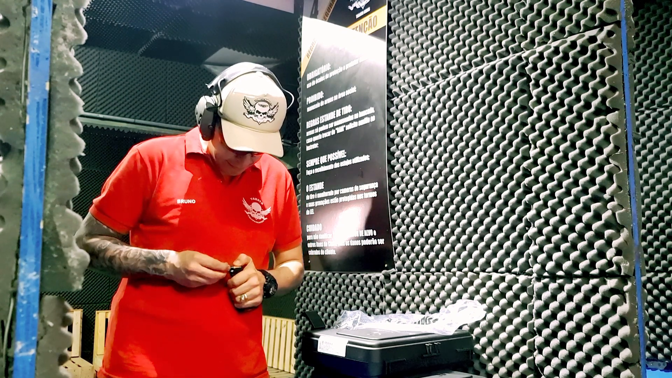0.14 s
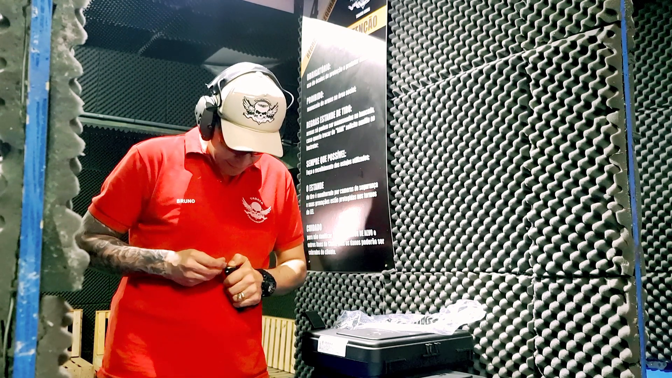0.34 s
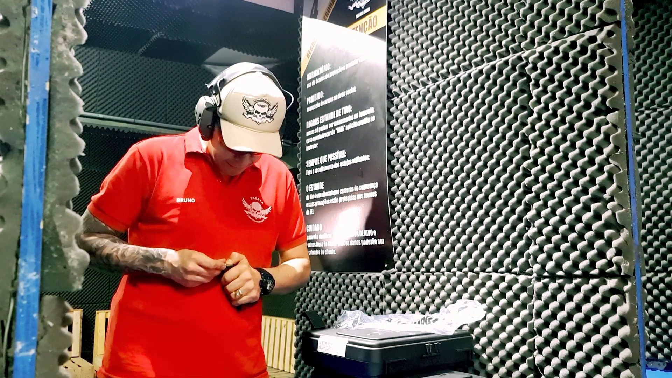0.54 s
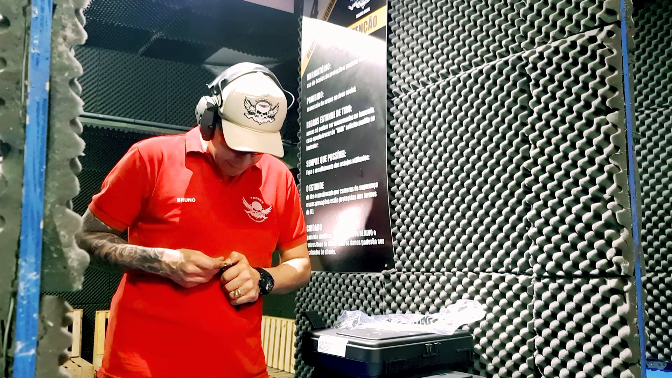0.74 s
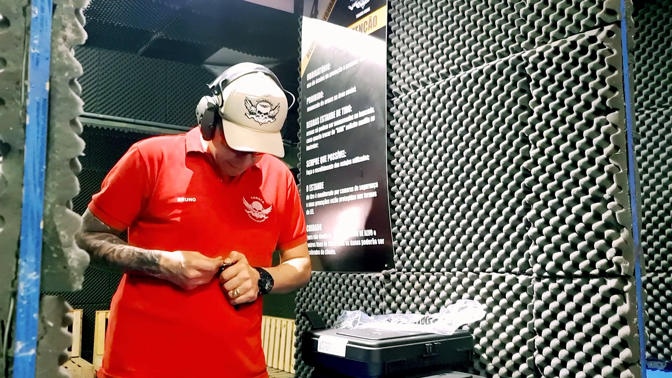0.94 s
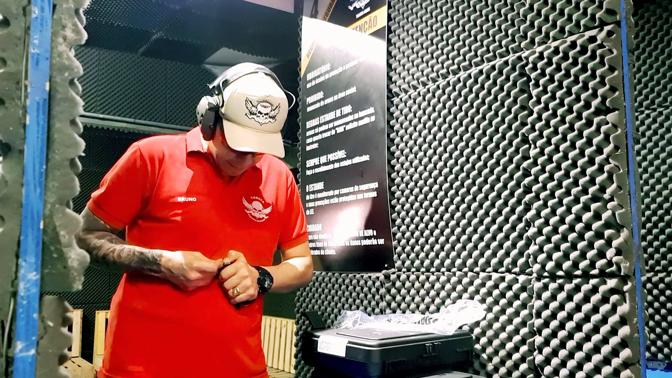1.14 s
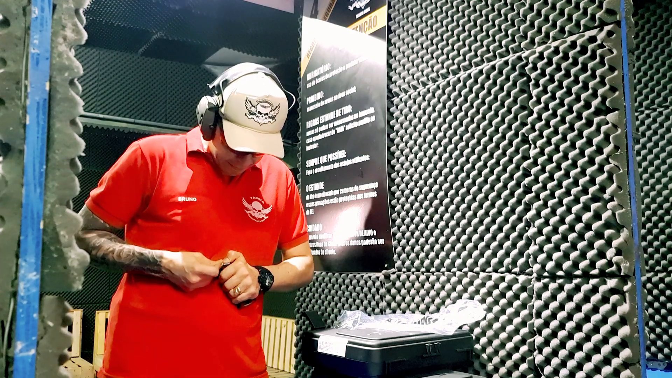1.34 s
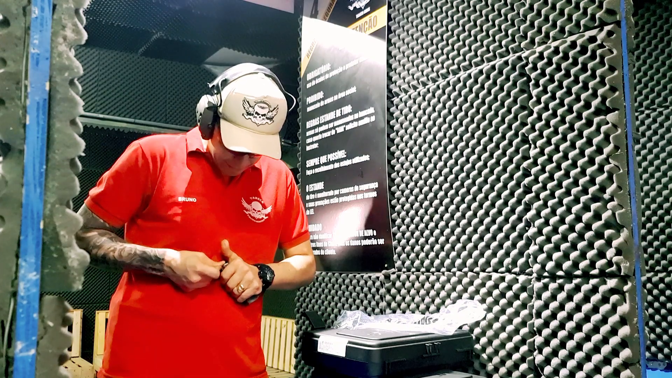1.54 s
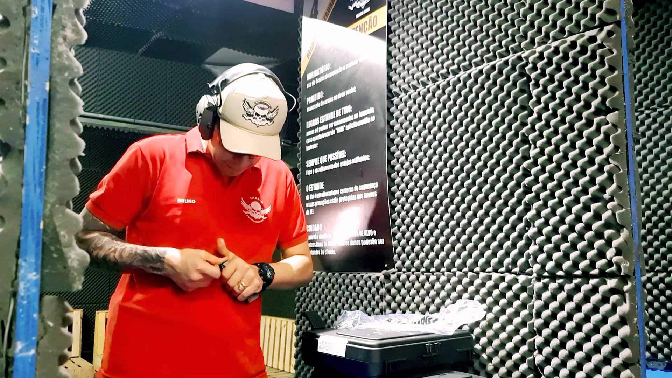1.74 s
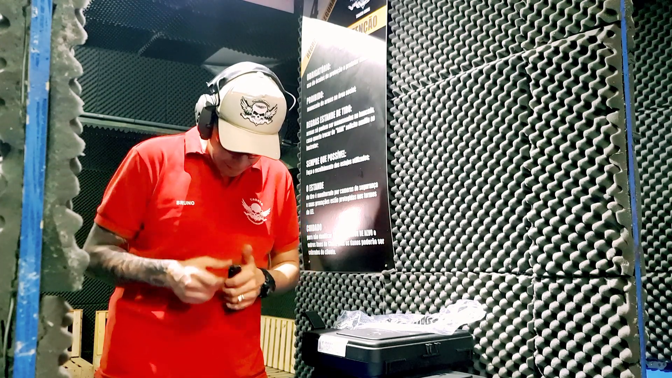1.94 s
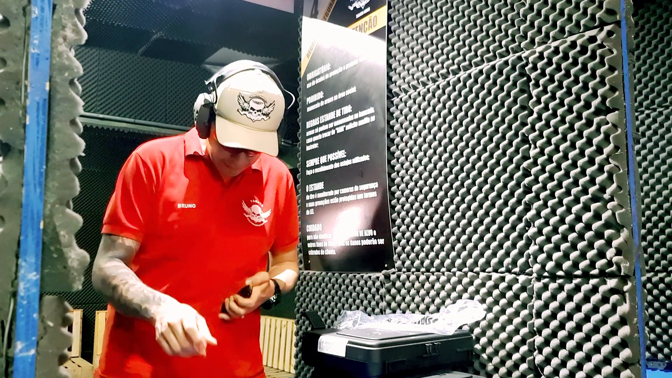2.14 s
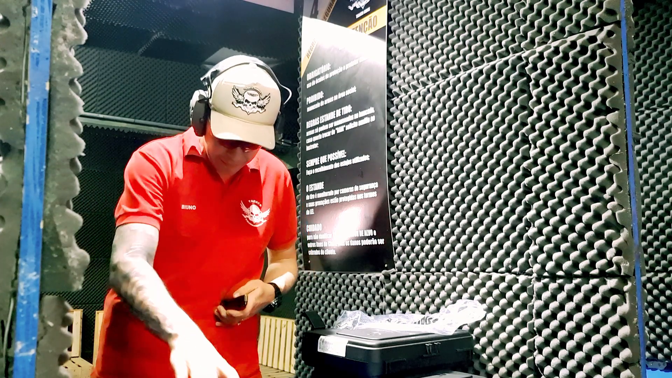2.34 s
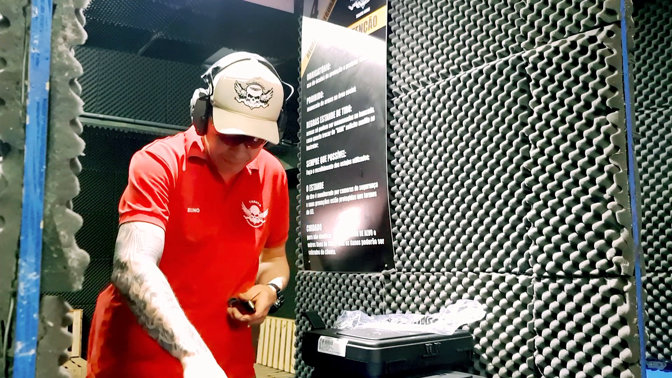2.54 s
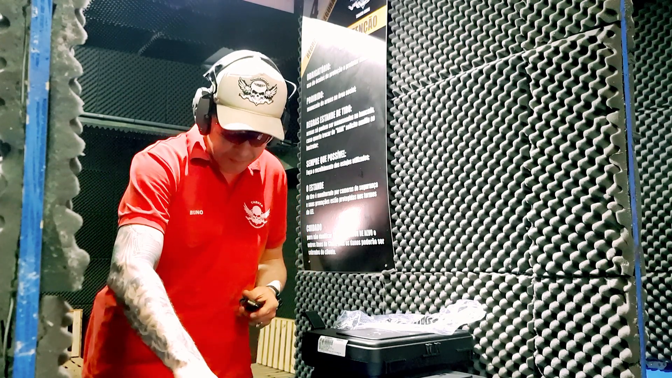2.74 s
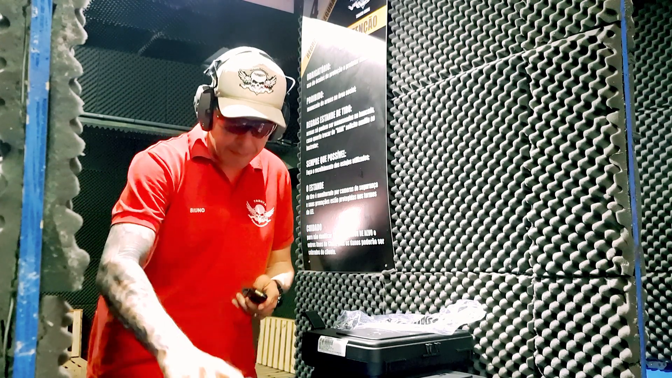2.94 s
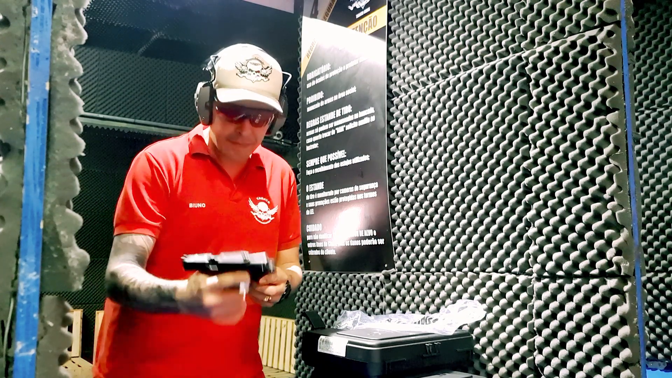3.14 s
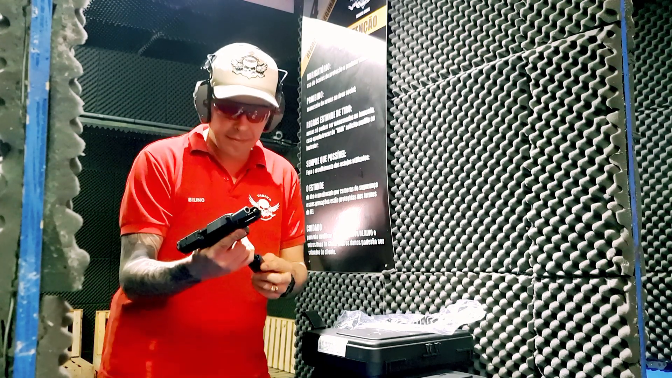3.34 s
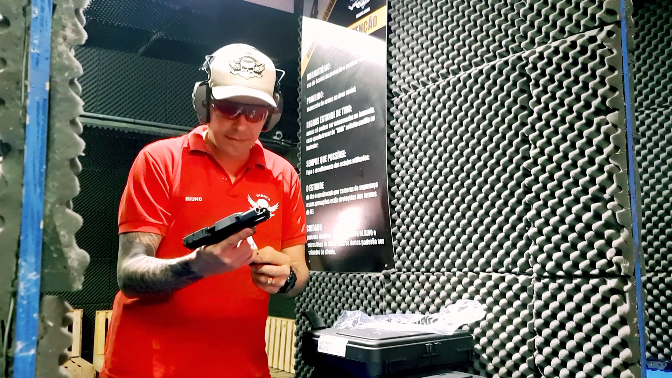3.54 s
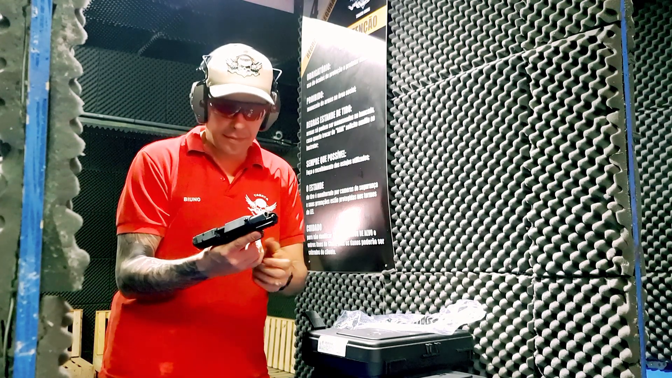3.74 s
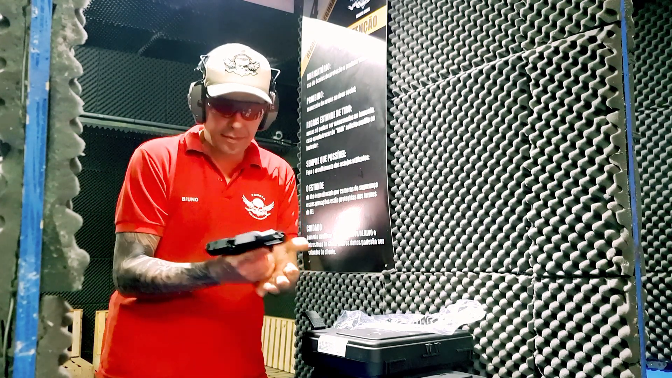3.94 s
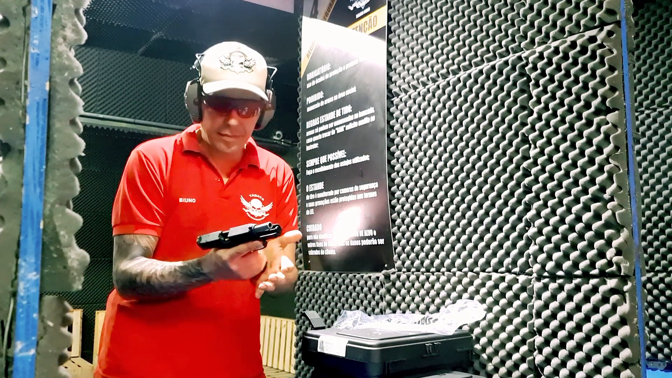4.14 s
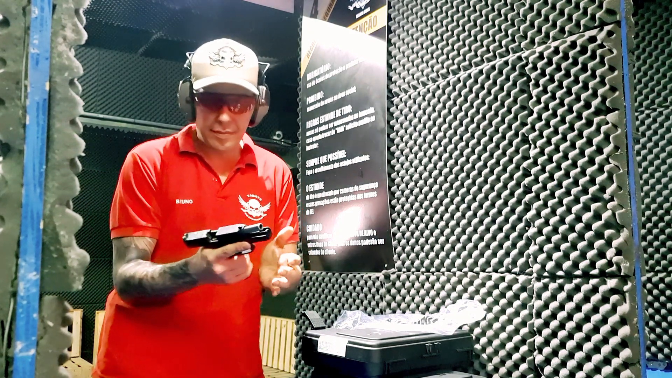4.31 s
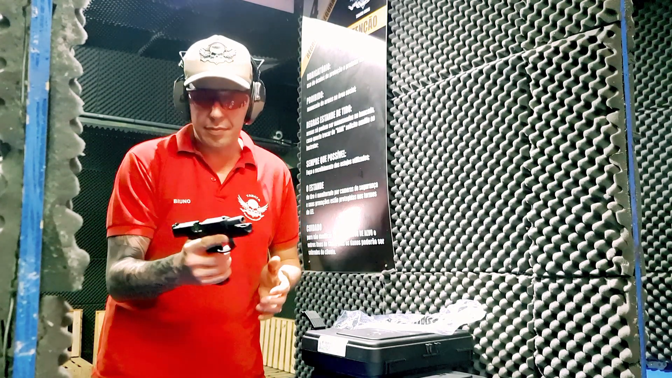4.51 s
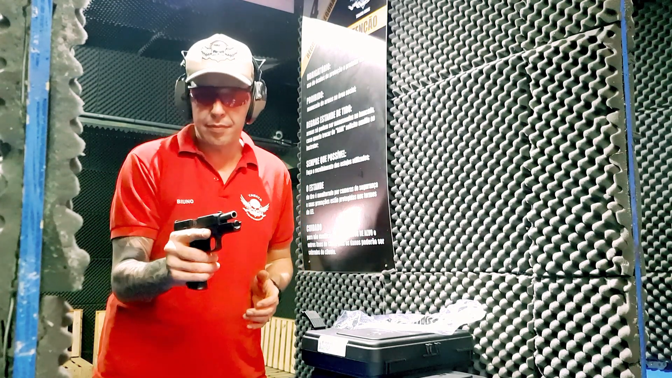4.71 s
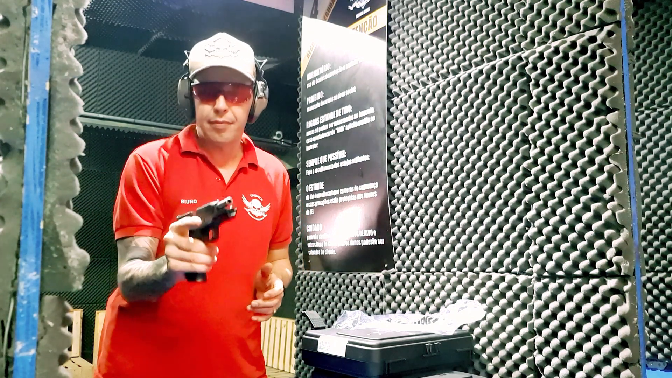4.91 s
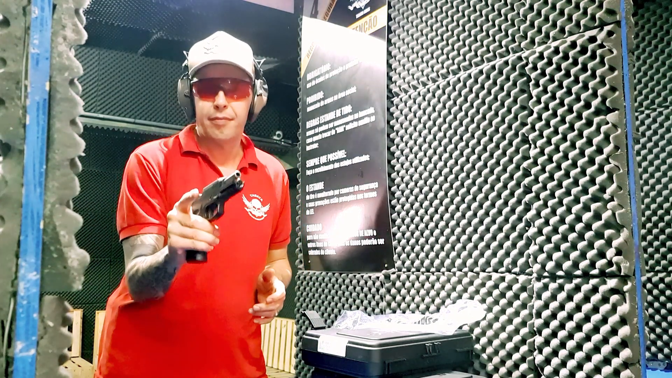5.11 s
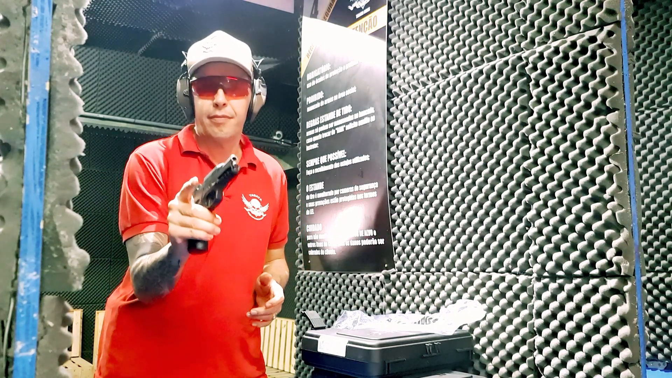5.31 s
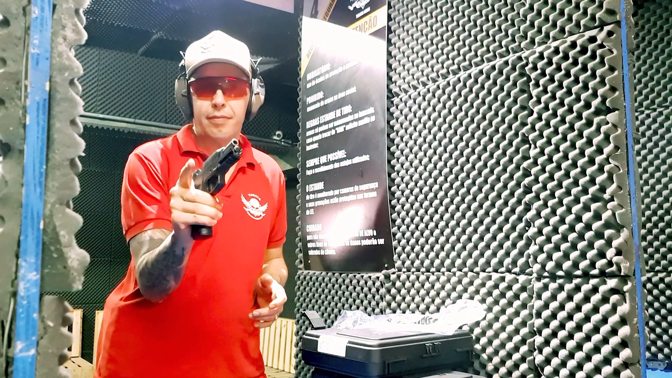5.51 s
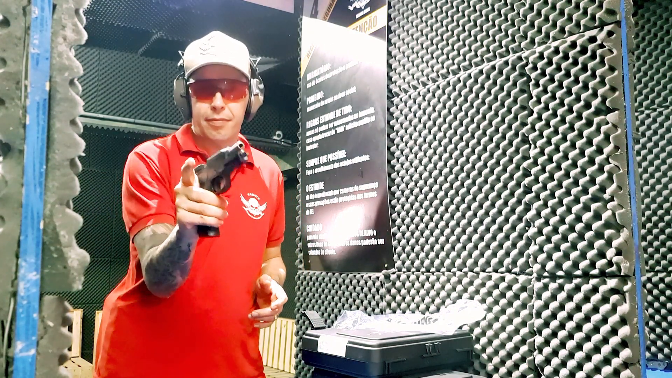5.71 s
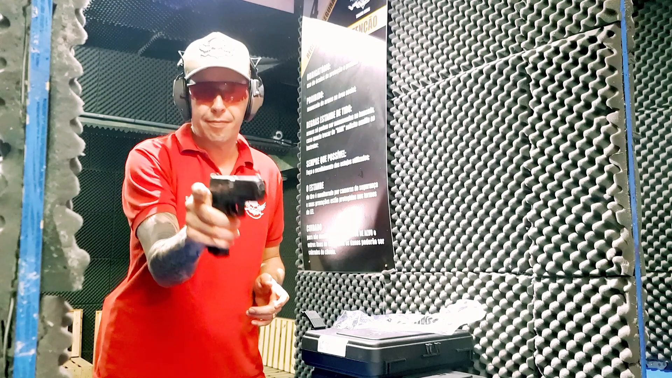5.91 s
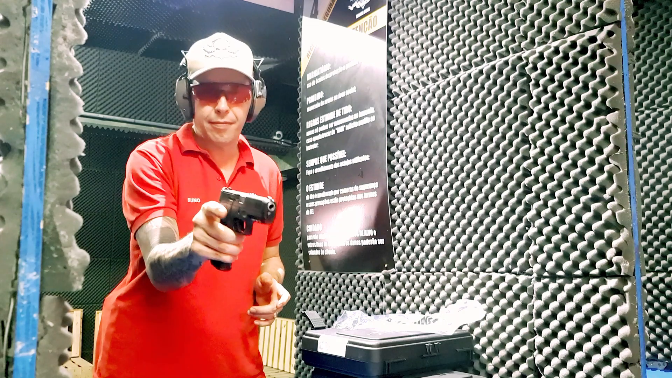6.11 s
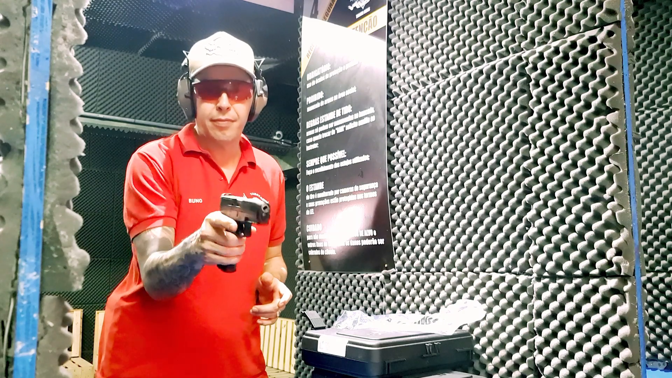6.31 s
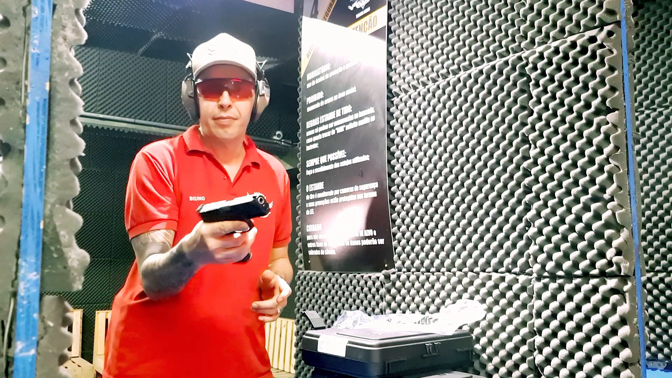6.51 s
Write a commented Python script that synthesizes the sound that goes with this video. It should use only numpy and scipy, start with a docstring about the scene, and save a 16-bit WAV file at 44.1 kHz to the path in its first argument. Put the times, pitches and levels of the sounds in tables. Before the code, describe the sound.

In an indoor range booth, heard close in stereo, low ventilation rumble and soft airy hiss run throughout; a very faint high ring dies away over the first second or so. From 0.2 s tiny brass clicks sound as a cartridge is thumbed into a magazine, with clear snaps at 1.62 and 1.76 s and weaker clicks to 1.9. Soft movement follows, then scattered pistol knocks from 2.5 s, sharper at 3.1 and 3.7, crowding together from 3.8 to 4.0 with short hoarse drags. At 4.05 s the magazine scrapes and slaps home, the loudest blow, with quick rebounds and a lane tail. Soft footfalls come near 4.5 and 5.0 s, with faint ticks. A low drone swells around 5.6. At 5.9 s the slide judders forward in a rapid metallic burst and locks, its spring ringing briefly. Reverberation fades into rumble, faint ticks and another low drone swell by 6.5 s.

```python
"""A low ventilation rumble, an airy hiss and a faint dying high ring come first, in a shooting-range booth.
Brass clicks follow as a cartridge is thumbed into a pistol magazine; the pistol knocks and ticks as it is
handled, the magazine is slapped home and the slide let fly forward. Each contact is a short noise chatter that
rings the part it hits. The booth scatters the sounds and the long lane answers the contacts.
The background is coloured noise and tones."""
import sys
import numpy as np
from scipy import signal
from scipy.fft import rfft, irfft, next_fast_len
from scipy.io import wavfile
from scipy.ndimage import uniform_filter1d

SR = 44100
rng = np.random.default_rng(int(sys.argv[2]) if len(sys.argv) > 2 else 0)


def store_pcm(level_fs):
    """Save levels as 16-bit WAV."""
    pcm = np.round(np.clip(level_fs, -1, 1) * 32767).astype(np.int16)
    wavfile.write(sys.argv[1], SR, np.atleast_2d(pcm).T)


N = 289290

# A contact's three registers, thud, body and edge: [low f/Hz, high f/Hz]
# In the contact tables below, each level sets one register's strength as an rms over 20 ms.
REGISTERS = [(250, 1200), (1200, 5000), (5000, 15000)]
# Brass clicks on the magazine lips: [t/s, body level/dB, edge level/dB, ring f/Hz, chatter decay/ms]
CARTRIDGE_CLICKS = [(0.23, -65, -75, 4230, 2.2), (0.526, -55.5, -58.5, 4750, 2.4),
                    (0.634, -50.5, -54, 4000, 0.8), (1.2635, -53.5, -54.5, 3380, 2.5),
                    (1.415, -60.5, -76, 2150, 2), (1.529, -68, -62, 6500, 2.3),
                    (1.5745, -73, -67, 7000, 1.3), (1.591, -63, -66, 2950, 1.5),
                    (1.6233, -35.3, -40.3, 2480, 1.5), (1.7615, -40, -49.5, 2960, 2.3),
                    (1.8768, -54.5, -66, 3020, 2.8), (1.892, -53, -58, 4170, 5.2)]
CARTRIDGE_THUD_DB = -5.5   # relative to the edge
# Knocks and faint ticks of the handled pistol, before and after the magazine goes home:
# [t/s, body level/dB, hardness/dB, ring f/Hz, chatter decay/ms]
HANDLING_KNOCKS = [(2.4645, -65, -9, 1360, 4.6), (2.7502, -45, 8, 1900, 4.2), (2.7937, -57, -11, 1000, 6),
                   (2.8948, -44.5, 3, 2400, 4.5), (3.135, -38.5, 15.5, 2680, 2.6),
                   (3.284, -50, 9, 3040, 1.7), (3.352, -78, -24, 481, 8.6), (3.492, -51, -7, 1970, 8),
                   (3.6985, -37.5, 8, 1250, 7.7), (3.799, -55, -3, 1400, 2.6), (3.809, -50, -2, 2900, 6.9),
                   (3.8175, -54.5, -12, 1288, 4), (3.8532, -48.5, -6, 1700, 7.3),
                   (3.879, -60, -12, 1200, 14), (3.905, -49.5, 1, 1400, 12), (3.96, -48.5, -1, 1900, 14),
                   (4.005, -57, -6, 1505, 7.6), (4.0225, -45, 0, 1900, 9), (4.448, -69.5, -9, 2000, 8),
                   (4.795, -70, 0, 1900, 3), (5.0435, -67.5, 3, 3200, 3.2), (5.2122, -67.5, 2, 3050, 4),
                   (5.69, -59, 9, 3000, 3), (5.8178, -52.5, 12, 3100, 6), (6.401, -69, -5, 1203, 5.3),
                   (6.4468, -67.5, 0, 3120, 3), (6.5112, -70, 16, 4020, 1.5)]
SOFT_EDGE_DB, EDGE_PER_HARDNESS = -16.5, .6   # edge over body at hardness 0; dB gained per dB of hardness
# The magazine shoves the catch aside and scrapes past it:
# [t/s, thud level/dB, body level/dB, edge level/dB, ring f/Hz, chatter decay/ms]
CATCH_SCRAPES = [(4.0464, -38.5, -21, -18, 1740, 1.7), (4.058, -46, -32.5, -34, 6700, 1.0),
                 (4.064, -41.5, -28.5, -36, 2100, 8)]
# The magazine hits home, first blow: [columns as for the catch]
SEAT_BLOW = (4.0762, -26.5, -18.5, -21, 2200, 2.5)
SEAT_GAP_S, SEAT_LOSS_DB = .0045, 4.8   # typical gap and loss per rebound
# The slide judders forward and strips a round, first blow: [columns as for the catch]
SLIDE_BLOW = (5.902, -38.3, -22.3, -24.3, 2400, 3.5)
SLIDE_GAP_S, SLIDE_LOSS_DB = .0048, .2   # typical gap and loss per judder
# The slide locks: [columns as for the catch]
LOCK_BLOW = (5.933, -35.5, -28, -23.5, 4675, 8.5)
# Resonances of each part: [f/Hz, width/Hz, level above the broad spectrum/dB]
MAGAZINE_MODES = [(1260, 71, 2), (1840, 52, 1), (2510, 110, 10), (2970, 70, -6), (4110, 160, -1.5),
                  (5930, 76, 7), (6700, 50, 6.5), (8600, 90, 3)]
FRAME_MODES = [(760, 98, 8.7), (1280, 90, 4), (1530, 130, 2), (2103, 150, 3), (2400, 77, 2),
               (2810, 34, 3.1), (3028, 90, 4), (4170, 300, 5), (5150, 240, 3.2)]
CATCH_MODES = [(1730, 60, 5), (3320, 75, 4), (3620, 40, 5), (3980, 26, 7), (5400, 40, 5), (6315, 16, 3.1),
               (6710, 90, 11), (9160, 30, 6)]
SEAT_MODES = [(650, 70, 5), (2110, 36, 6), (2226, 30, 4), (2450, 50, 2), (2663, 29, 4.6), (2820, 40, 4),
              (3004, 40, 4.5), (3860, 22, 6), (4660, 40, 3), (5370, 35, 4), (6200, 33, 4), (6620, 44, 5),
              (7100, 48, 4), (9530, 60, 5)]
SLIDE_MODES = [(600, 150, 6), (1940, 80, 4), (2120, 34, 3.4), (2420, 23, 3.4), (2850, 35, 4),
               (3050, 35, 4.5), (3283, 25, 4.6), (4230, 30, 5), (4460, 26, 4.5), (4550, 45, 3),
               (6500, 73, 3.4), (7850, 150, 3), (11600, 80, 4)]
# Broad colour of each contact, before its registers are set: [f/Hz, relative level/dB]
MAGAZINE_TONE = [(150, -28), (250, -13), (823, -5.5), (2060, -8), (2240, -8), (2530, -18), (2760, -7),
                 (8620, -5.5), (9390, -14), (13700, -14.5), (15500, -55)]
FRAME_TONE = [(150, -39.5), (250, 3), (961, -9.5), (1220, -2), (2800, -4.5), (4030, -9.5), (4870, -11),
              (5690, -12.5), (9560, -28), (11600, -27.5), (15500, -38)]
CATCH_TONE = [(150, -46.5), (250, -20.5), (525, -21.5), (1380, -6), (1730, -3.5), (2090, -5.5),
              (2900, -9.5), (4100, -4.5), (4870, -14), (6540, -5), (7900, -15), (9390, -18), (10600, -30),
              (12200, -17), (15500, -28)]
SEAT_TONE = [(150, -18), (350, -13), (490, -14), (600, -5), (700, -4), (820, -10), (1050, -9), (1800, -10),
             (2200, -5), (3900, -5), (7000, -12), (9000, -20), (11800, -20), (15500, -29)]
SLIDE_TONE = [(150, -31), (350, -13), (480, -15.5), (650, -11), (1100, -13), (1600, -1.5), (2300, -2.5),
              (3100, -1), (4300, -2), (5900, -8), (7900, -7), (10000, -14.5), (12000, -11), (15500, -23)]
# The recoil spring sings on: [t/s, f/Hz, peak level of the main tone/dB, t60/s]
SPRING = (5.91, 1942, -37, 0.3)
# The grip drags over a surface: [t/s, level before its envelope/dB, start f/Hz, end f/Hz, pitch fall/s]
DRAGS = [(2.794, -42, 1699, 245, .008), (3.817, -44, 750, 400, .005)]
# The lane's tail: [f/Hz, t60/s, relative level/dB]
LANE = [(200, .5, -1), (590, .48, 0.5), (1190, 0.47, -3.5), (2500, 0.42, -2.5), (5000, .36, -2.5),
        (9000, 0.28, -3), (14000, .21, -1.5)]
FAR_WALL_S, MIC_LAG_S = .17, .00006   # start of the far echo; delay of the right channel
# Likeness of left and right, in diffuse and in direct sound: [f/Hz, likeness from 0 to 1]
DIFFUSE_LIKENESS = [(60, .92), (130, 1), (250, 0.2), (500, 0.1), (1000, 0), (4000, 0.1), (12000, .05)]
DIRECT_LIKENESS = [(300, 1), (1000, 0.78), (3000, 0.71), (8000, 0.31), (15000, .4)]
# Soft, dull footfalls as the shooter shifts weight: [t/s, length/s, level/dB]
STEPS = [(4.47, .2, -46), (5.04, .2, -51)]
STEP_ATTACK_S, STEP_RELEASE_S = .05, .1
# Soft low noise: body and sleeves shifting, and the dull thump under the magazine and slide blows:
# [t/s, length/s, level/dB]
SOFT_LOW_SWELLS = [(2.28, .45, -58), (2.8, .07, -50.5), (3.33, .05, -49), (3.48, .12, -55),
                   (3.86, .11, -45.5), (4.05, .07, -46), (4.2, 2.35, -59), (5.9, .1, -48), (6.4, .12, -56)]
SOFT_LOW_REST_DB, SOFT_LOW_ATTACK_S, SOFT_LOW_RELEASE_S = -65.5, .03, .045
# Ventilation rumble, before a small left-right tilt: [t/s, level/dB]
RUMBLE_LEVEL = [(0, -52.5), (2.5, -51), (3.0, -48), (4.6, -45.5), (5.5, -48), (6.56, -47)]
# Airy hiss of the ventilation: [t/s, level/dB]
AIR_LEVEL = [(0, -57), (2.2, -57), (3.2, -54.5), (4.4, -60), (5.5, -58.5), (6.56, -62)]
# Colours of the background noises: [f/Hz, relative level/dB]
STEP_TONE = [(60, -25.5), (105, -1.5), (150, 0), (210, -2.5), (270, -7.5), (330, -20), (400, -13.5),
             (480, -25.5), (1500, -54.5)]
SOFT_LOW_TONE = [(60, -26.5), (110, -2.5), (200, 0.5), (300, -7), (450, -11.5), (900, -23.5), (2000, -33.5),
                 (6000, -55.5)]
RUMBLE_TONE = [(15, -25.5), (25, -15.5), (42, -8), (55, -4), (66, 2), (85, -4), (105, -11), (150, -29),
               (300, -63.5)]
AIR_TONE = [(60, -8), (110, -2.5), (160, -9), (245, -6.5), (310, -12), (385, -5), (470, -15.5),
            (680, -15.5), (1000, -22.5), (1800, -22.5), (3200, -27), (5500, -34.5), (9000, -44),
            (12000, -38), (15500, -39.5)]
# A drone swells in the building: [t/s, length/s, level before swell and tilt/dB, start f/Hz]
DRONE_SWELLS = [(5.53, .36, -42.5, 78.5), (6.42, .17, -33.5, 93)]
DRONE_ATTACK_S, DRONE_RELEASE_S, DRONE_RISE_HZ_PER_S = .2, .12, 7
# A faint high ring dies away from the start: [f/Hz, starting peak level/dB]
WHINE = [(2159, -75), (2283, -79), (2534, -70), (2558, -72)]
WHINE_T60_S = 1.6
CUTOFF_HZ = 15600


def contacts(table, tone, modes, ring_db, ring_width, rise_ms, grit_db, size=8192):
    """Each contact is a dying chatter of tiny impacts that rings the part; where it lands favours one pitch."""
    out = np.zeros((2, N + size))
    hz = np.fft.rfftfreq(size, 1 / SR)
    ms = np.arange(size) / SR * 1000
    part = from_db(at_hz(tone, hz)) * np.sqrt(np.abs(1 + sum(peak(hz, *mode) for mode in modes)))
    filters = [signal.butter(3, band, "band", fs=SR, output="sos") for band in REGISTERS]
    registers = [signal.sosfreqz(sos, hz, fs=SR)[1] for sos in filters]
    weights = np.abs(registers) ** 2 + 1e-12
    low_cut = hz ** 2 / (hz ** 2 + 180 ** 2)
    right_later = np.exp(-2j * np.pi * hz * MIC_LAG_S * np.array([[0], [1]]))
    fade_out = np.minimum(np.linspace(2, 0, size), 1)   # fade the end smoothly to silence
    for s, *levels, ring_hz, chatter_ms in table:
        envelope = (1 - np.exp(-(ms / rise_ms) ** 2)) * np.exp(-ms / max(chatter_ms, .1))
        grit = from_db(grit_db * np.repeat(rng.standard_normal(size // 16), 16))   # uneven strength
        chatter = rng.standard_normal((2, size)) * envelope * grit
        blow = two_ports(rfft(chatter), DIRECT_LIKENESS, hz)
        # flatten the broad spectrum so that every pitch gets its share
        smooth_power = uniform_filter1d(np.abs(blow) ** 2, size=160, axis=1)
        blow /= causal(np.sqrt(smooth_power + 1e-12))
        colour = part * np.sqrt(np.abs(0.5 + peak(hz, ring_hz, ring_width * ring_hz, ring_db)))
        # the hardness of the contact sets how much goes into each register
        energy = [np.mean(np.sum(irfft(blow * colour * band) ** 2, axis=1)) for band in registers]
        gains = from_db(levels) * np.sqrt(.02 * SR / np.array(energy))
        hardness = np.exp(np.log(gains) @ weights / weights.sum(0)) * low_cut
        at = int(s * SR)
        out[:, at:at + size] += irfft(blow * causal(colour * hardness) * right_later) * fade_out
    return out[:, :N]


def rebounds(blow, gap_s, loss_db, count):
    """A blow repeats at uneven gaps, weaker each time and landing a little differently."""
    s, thud, body, edge, ring_hz, chatter_ms = blow
    rows = []
    for k, (late, place) in enumerate(rng.uniform(-1, 1, (count, 2))):
        when = s + gap_s * (k + .25 * late * (k > 0))
        loss = k * loss_db
        rows.append((when, thud - loss, body - loss, edge - loss, ring_hz * 2 ** (.4 * place), chatter_ms))
    return rows


def magazine_home():
    """The magazine scrapes past the catch, hits home and rebounds."""
    seating = rebounds(SEAT_BLOW, SEAT_GAP_S, SEAT_LOSS_DB, count=3)
    catch = contacts(CATCH_SCRAPES, CATCH_TONE, CATCH_MODES,
                     ring_db=2.5, ring_width=.12, rise_ms=1.3, grit_db=2)
    seat = contacts(seating, SEAT_TONE, SEAT_MODES, ring_db=2, ring_width=.3, rise_ms=1.2, grit_db=2.5)
    return (catch + seat) * from_db([[-.7], [.7]])   # a little to the right


def slide():
    """The slide judders forward in a string of blows, then locks."""
    closing = rebounds(SLIDE_BLOW, SLIDE_GAP_S, SLIDE_LOSS_DB, count=6) + [LOCK_BLOW]
    return contacts(closing, SLIDE_TONE, SLIDE_MODES, ring_db=1.5, ring_width=0.3, rise_ms=1.6, grit_db=2.5)


def cartridge():
    """The sharper the brass snaps, the harder it also thuds against the follower."""
    rows = [(s, edge + CARTRIDGE_THUD_DB, body, edge, hz, ms) for s, body, edge, hz, ms in CARTRIDGE_CLICKS]
    return contacts(rows, MAGAZINE_TONE, MAGAZINE_MODES,
                    ring_db=6, ring_width=0.12, rise_ms=0.73, grit_db=-3.5)


def handling():
    """A hard contact trades thud for edge; a soft one, through the hand, does the opposite."""
    rows = []
    for s, body, hard, hz, ms in HANDLING_KNOCKS:
        edge = body + SOFT_EDGE_DB + EDGE_PER_HARDNESS * hard
        rows.append((s, body - hard, body, edge, hz, ms))
    return contacts(rows, FRAME_TONE, FRAME_MODES, ring_db=5, ring_width=0.2, rise_ms=1.1, grit_db=3)


def spring():
    """The shaken coil sings two close tones that beat against each other as they die away."""
    s, hz, db, t60 = SPRING
    t = np.maximum(np.arange(N) / SR - s, 0)
    pair = np.sin(2 * np.pi * hz * t) + .4 * np.sin(2 * np.pi * (hz - 48) * t)
    return from_db(db - 60 * t / t60) * pair


def drags(rough, fade_s):
    """Stick and slip slow down as the drag comes to rest; the uneven slipping makes the tone hoarse."""
    out = np.zeros(N)
    t = np.arange(int(.15 * SR)) / SR
    envelope = (1 - np.exp(-t / 0.0017)) * np.exp(-t / fade_s)
    for s, db, start_hz, end_hz, fall_s in DRAGS:
        waver = rms_one(uniform_filter1d(rng.standard_normal(len(t)), size=40))
        hz = (end_hz + (start_hz - end_hz) * np.exp(-t / fall_s)) * (1 + rough * waver)
        tone = np.sqrt(2) * np.sin(2 * np.pi * np.cumsum(hz) / SR)
        at = int(s * SR)
        out[at:at + len(t)] += from_db(db) * envelope * tone
    return out


def booth(x, wet_db, first_s, fade_s):
    """Bench, ceiling and partitions scatter the near sounds into a short, dying noise tail."""
    t = np.arange(int(.08 * SR)) / SR
    response = rng.standard_normal((2, len(t))) * (t > first_s) * np.exp(-t / fade_s)
    response /= np.sqrt(np.sum(response ** 2, axis=1, keepdims=True))
    return x + from_db(wet_db) * signal.fftconvolve(x, response, axes=1)[:, :N]


def lane(x, far_db, far_spread_s, far_cut_hz, build_s):
    """The long lane: a tail that dies fastest in the treble, and a dull, smeared echo off the far end."""
    t = np.arange(int(.7 * SR)) / SR
    hz = np.fft.rfftfreq(len(t), 1 / SR)
    white = two_ports(rfft(rng.standard_normal((2, len(t)))), DIFFUSE_LIKENESS, hz)
    late = np.maximum(t - FAR_WALL_S, 0) / far_spread_s
    response = 0
    edges = np.geomspace(100, 16000, 12)   # eleven bands, each with its own decay
    for low, high in zip(edges, edges[1:]):
        centre = np.sqrt(low * high)
        tail = from_db(-60 * t / at_hz(LANE, centre)) * (1 - np.exp(-t / build_s))
        echo = from_db(far_db) * late * np.exp(1 - late) / (1 + (centre / far_cut_hz) ** 2)
        band = irfft(white * ((hz >= low) & (hz < high)), len(t))
        response = response + band * np.hypot(tail, echo) * from_db(at_hz(LANE, centre, axis=2))
    response = response / np.sqrt(np.sum(response ** 2) / 2)
    return signal.fftconvolve(x, response, axes=1)[:, :N]


def footfalls():
    """Soft footfalls are dull noise that swells and dies away."""
    return swells(STEPS, STEP_ATTACK_S, STEP_RELEASE_S) * noise(STEP_TONE)


def soft_low_noise():
    """Shifting body and sleeves, and the dull thump under the blows, swell out of a faint steady noise."""
    gain = swells(SOFT_LOW_SWELLS, SOFT_LOW_ATTACK_S, SOFT_LOW_RELEASE_S)
    return np.hypot(from_db(SOFT_LOW_REST_DB), gain) * noise(SOFT_LOW_TONE)


def drone(octave_db):
    """Each swell is a low tone with a weak octave, creeping upwards."""
    out = 0
    for s, length_s, db, start_hz in DRONE_SWELLS:
        hz = start_hz + DRONE_RISE_HZ_PER_S * (np.arange(N) / SR - s)
        phase = 2 * np.pi * np.cumsum(hz) / SR
        tone = np.sqrt(2) * (np.sin(phase) + from_db(octave_db) * np.sin(2 * phase))
        out = out + from_db(db) * swell(s, length_s, DRONE_ATTACK_S, DRONE_RELEASE_S) * tone
    return out


def whine():
    """A few high, steady tones fade together."""
    t = np.arange(N) / SR
    tones = sum(from_db(db) * np.sin(2 * np.pi * hz * t) for hz, db in WHINE)
    return tones * np.exp(-np.log(1000) * t / WHINE_T60_S)


def ventilation_rumble():
    """Moving air rumbles as very low noise whose level drifts."""
    return from_db(level_in_time(RUMBLE_LEVEL)) * noise(RUMBLE_TONE)


def ventilation_hiss():
    """The airy part of the ventilation is broad noise whose level drifts."""
    return from_db(level_in_time(AIR_LEVEL)) * noise(AIR_TONE)


def background():
    """The soft low noise, footfalls, fading ring, drone and ventilation add up."""
    low = (ventilation_rumble() + drone(octave_db=-15)) * from_db([[.7], [-.7]])   # a little to the left
    return low + ventilation_hiss() + soft_low_noise() + footfalls() + whine()


def swell(s, length_s, attack_s, release_s):
    """A gain that rises to a ceiling and starts to die away once its length is over."""
    t = np.arange(N) / SR - s
    return np.clip(t / attack_s, 0, 1) * np.exp(-np.maximum(t - length_s, 0) / release_s)


def swells(rows, attack_s, release_s):
    """The joint gain of several swells, whose powers add."""
    power = sum((from_db(db) * swell(s, length_s, attack_s, release_s)) ** 2 for s, length_s, db in rows)
    return np.sqrt(power)


def noise(tone):
    """Steady diffuse stereo noise of a given colour; rms 1."""
    size = next_fast_len(N, real=True)
    hz = np.fft.rfftfreq(size, 1 / SR)
    white = two_ports(rfft(rng.standard_normal((2, size))), DIFFUSE_LIKENESS, hz)
    return rms_one(irfft(white * from_db(at_hz(tone, hz)), size)[:, :N])


def two_ports(pair, likeness, hz):
    """Two unrelated spectra become a left and a right one of the given likeness."""
    alike = np.clip(at_hz(likeness, hz), 0, 1)
    shared = np.sqrt(1 + alike) * pair[0]
    opposed = np.sqrt(1 - alike) * pair[1] * np.array([[1], [-1]])
    return shared + opposed


def peak(hz, centre, width, db):
    """The power one resonance adds to a flat spectrum of 1."""
    return (from_db(2 * db) - 1) / (1 + (2 * (hz - centre) / width) ** 2)


def causal(gain):
    """The minimum-phase response with this gain: resonances ring after the blow."""
    cepstrum = irfft(np.log(gain + 1e-9))
    half = cepstrum.shape[-1] // 2
    cepstrum[..., 1:half] *= 2
    cepstrum[..., half + 1:] = 0
    return np.exp(rfft(cepstrum))


def at_hz(points, hz, axis=1):
    """Read a column of a table along a log-frequency axis."""
    points = np.array(points)
    return np.interp(np.log(hz + 1e-9), np.log(points[:, 0]), points[:, axis])


def level_in_time(rows):
    """Read a level curve sample by sample."""
    s, db = np.transpose(rows)
    return np.interp(np.arange(N) / SR, s, db)


def from_db(db):
    """Turn decibels into a gain."""
    return 10 ** (np.asarray(db) / 20)


def rms_one(x):
    """Scale a signal to an rms of 1."""
    return x / np.sqrt(np.mean(x ** 2) + 1e-20)


def scene():
    """Near sounds pass through the booth; the slide and magazine blows are sent to the lane most strongly."""
    home, closing, clicks, knocks = magazine_home(), slide(), cartridge(), handling()
    by_hand = clicks + knocks + home + closing + spring() + drags(rough=.25, fade_s=.042)
    near = booth(by_hand, wet_db=-5, first_s=0.0028, fade_s=.013)
    sent = from_db(-13.5) * home + from_db(-11) * closing + from_db(-15.5) * clicks + from_db(-14.5) * knocks
    far = lane(sent, far_db=-25.5, far_spread_s=0.018, far_cut_hz=6000, build_s=.012)
    return near + far + background()


def record(dry):
    """The hardest peaks are rounded and the top is cut steeply."""
    rounded = .85 * np.tanh(dry / .85)
    top_cut = signal.ellip(10, .2, 80, CUTOFF_HZ, fs=SR, output="sos")
    return signal.sosfilt(top_cut, rounded)


dry = scene()
out = record(dry)
store_pcm(out)
```